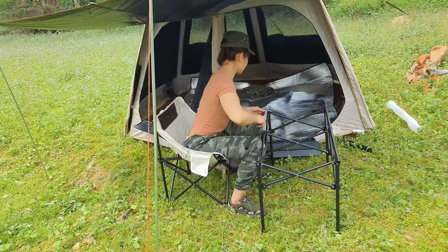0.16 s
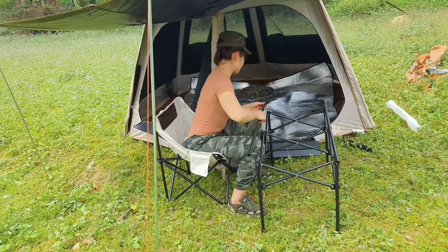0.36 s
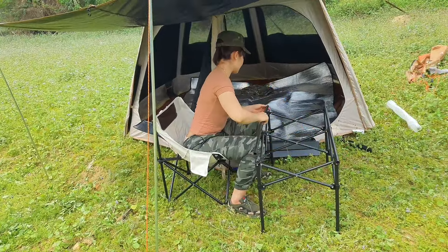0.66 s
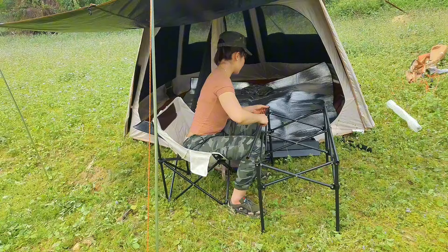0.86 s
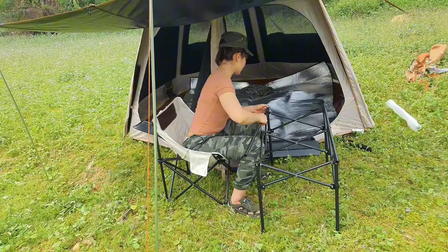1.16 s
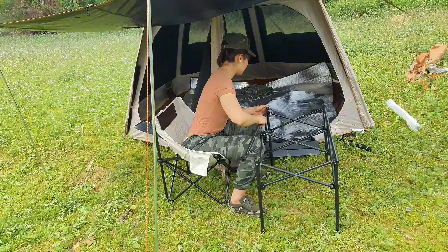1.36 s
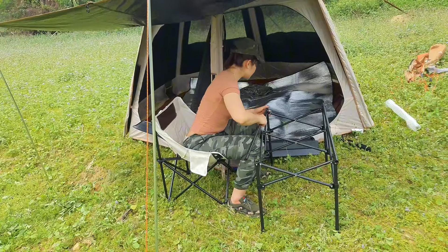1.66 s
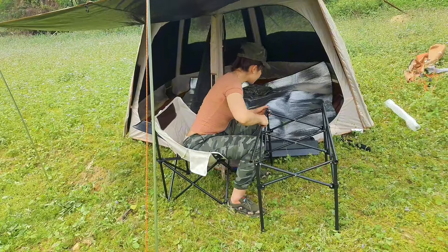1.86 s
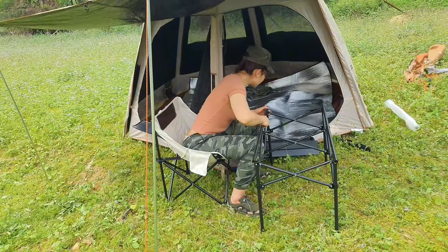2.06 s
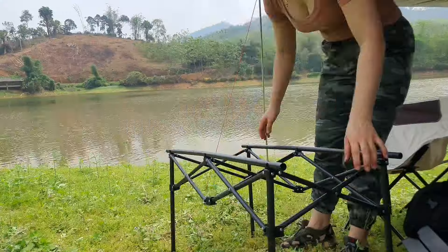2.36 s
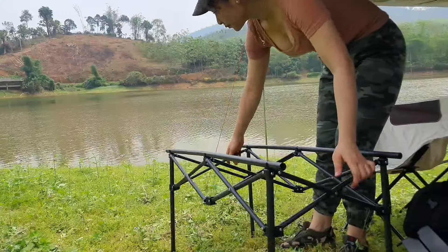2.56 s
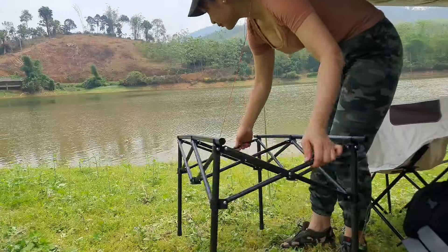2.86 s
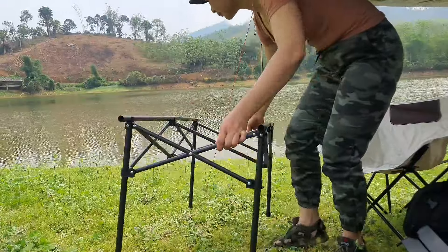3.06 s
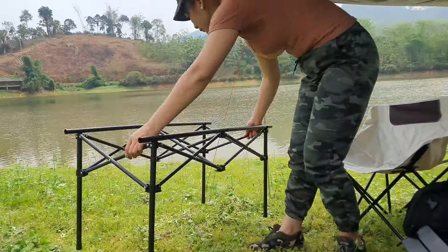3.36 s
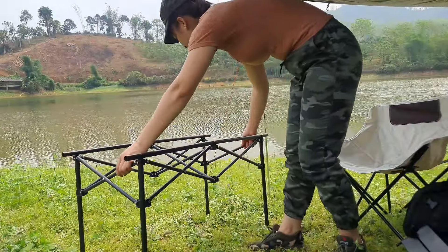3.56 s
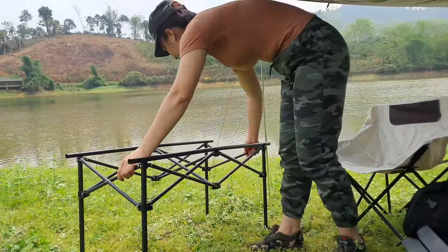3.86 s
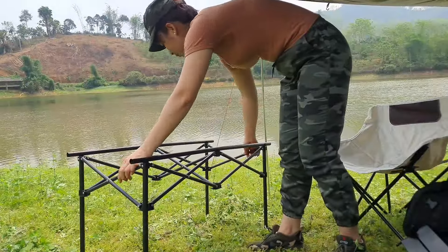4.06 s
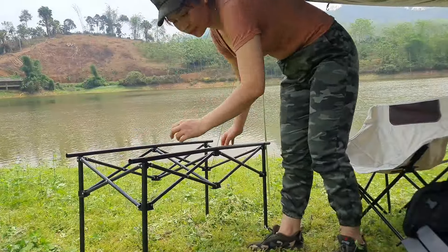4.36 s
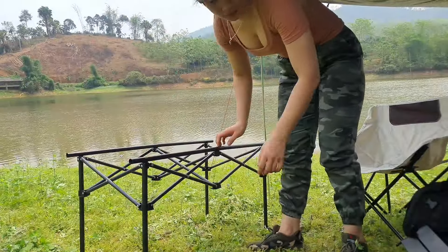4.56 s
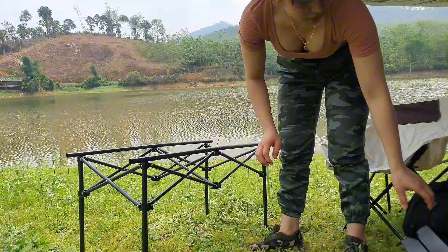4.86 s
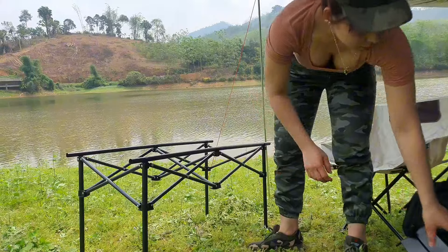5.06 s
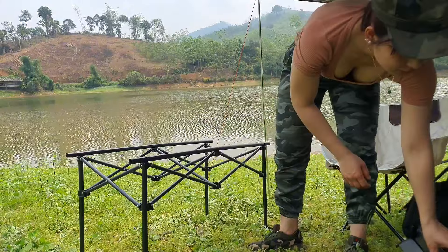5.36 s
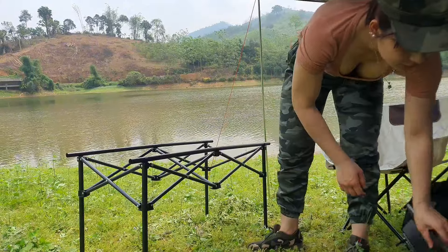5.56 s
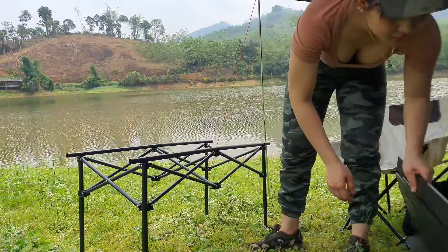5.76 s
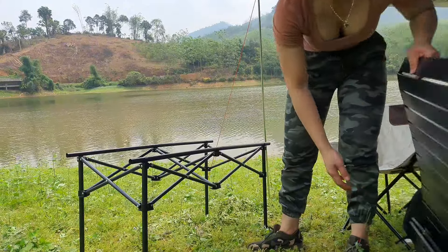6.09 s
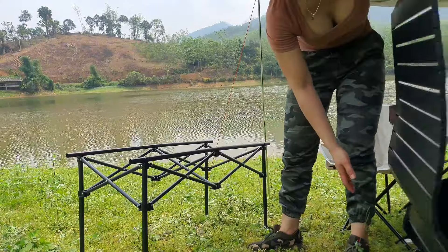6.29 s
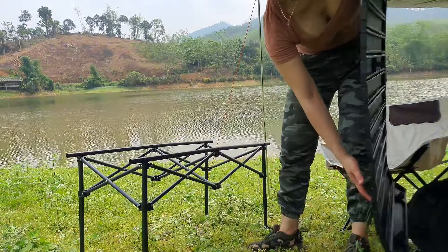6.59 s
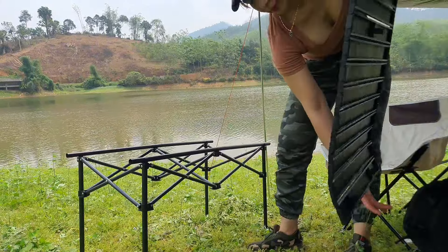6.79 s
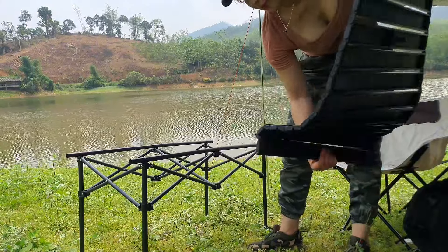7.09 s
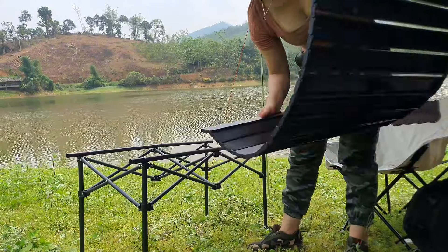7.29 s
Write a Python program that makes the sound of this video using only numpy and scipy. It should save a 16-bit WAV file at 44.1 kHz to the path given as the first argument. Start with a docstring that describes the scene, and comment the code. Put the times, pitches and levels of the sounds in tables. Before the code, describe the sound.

Quiet lakeside air with wind, then distant engine putter; a folding table frame clacks, and loose metal slats clatter on the right.

```python
"""A folding camp table is set up on the grass beside a lake, birds calling around it.
At first wind brushes the left side over a low drone; the tube frame is brushed, snaps open and knocks.
At 2.4 s the level dips briefly; a far engine replaces wind and drone, an insect buzzes, the frame knocks on.
From 5.2 s the roll-up top of metal slats is lifted and clatters, ringing less once it hangs taut.
Blows are flurries of contacts driving damped modes; engine and drone are tones, wind and air are noise."""
import sys
import numpy as np
from scipy import signal
from scipy.fft import rfft, irfft
from scipy.io import wavfile

SR = 44100
rng = np.random.default_rng(int(sys.argv[2]) if len(sys.argv) > 2 else 0)


def materialize(psi):
    """Save the field psi as 16-bit PCM at rate SR to the path in sys.argv[1].

    A 1-D psi becomes a single channel; in a 2-D psi each row is a channel.
    """
    bounded = np.clip(np.atleast_2d(psi).T, -1, 1)
    quanta = np.round(bounded * 32767).astype(np.int16)
    wavfile.write(sys.argv[1], SR, quanta)


N = 327663
TIME = np.arange(N) / SR
SWITCH_S = 2.4  # wind and drone before, engine after

# Ringing modes of the slats. Each row: frequency in Hz, relative level in dB, t60 in seconds.
SLAT_MODES = [(359, -13, 0.23), (547, -12, 0.44), (639, -14, 0.28), (940, -1.5, 0.27), (960, 0, 0.29),
              (1104, -10.5, 0.22), (1514, -1.5, 0.13), (1654, -8.5, 0.26), (2820, -22, 0.18),
              (2816, -5, 0.18), (3600, -20.5, 0.078), (4220, -24, 0.052), (5010, -15, 0.041)]
# Spectrum of the slats' dense short-lived modes. Each row: frequency in Hz, density in dB per Hz.
SLAT_COLOUR = [(60, -23), (160, -4), (300, -13.5), (430, -12), (600, 1), (760, -3), (1050, 3.5),
               (2000, -0.5), (4000, -1), (5800, -7.5), (7700, -9), (8900, -31), (10500, -15.5),
               (15500, -14.5)]


def from_db(db):
    """Decibels to amplitude gain."""
    return 10 ** (np.asarray(db) / 20)


def rms_one(x):
    """Scale to rms 1."""
    return x / np.sqrt(np.mean(x ** 2) + 1e-30)


def in_time(rows):
    """Columns of a breakpoint curve, interpolated at every sample."""
    s, *columns = np.transpose(rows)
    return [np.interp(TIME, s, column) for column in columns]


def at_hz(points, hz):
    """Spectrum read on a log-frequency axis."""
    point_hz, value = np.transpose(points)
    return np.interp(np.log(hz + 1), np.log(point_hz), value)


def add(out, s, sound):
    """Mix a sound in from time s."""
    start = int(round(s * SR))
    low, high = max(start, 0), min(start + sound.shape[-1], N)
    out[..., low:high] += sound[..., low - start:high - start]


def drift(rate_hz):
    """Random wavering between independent normal knots of spread 1, joined by straight lines."""
    knots = rng.standard_normal(2 ** 12)
    return np.interp(TIME * rate_hz, np.arange(len(knots)), knots)


def ring(force, hz, t60_s):
    """One damped mode: a two-pole resonator driven by the force."""
    radius = from_db(-60 / (t60_s * SR))
    w = 2 * np.pi * hz / SR
    return signal.lfilter([0, np.sin(w)], [1, -2 * radius * np.cos(w), radius ** 2], force + 1e-18)


def noise(spectrum, size, bass_db=0, treble_db=0, ripple_db=0, ripple_hz=75):
    """Stereo coloured noise with two shelves, chance resonances and set correlation between the ears."""
    # Likeness of the ears. Each row: frequency in Hz, correlation.
    likeness = [(100, 0.81), (600, 0.58), (1200, 1), (3000, 0.23), (7000, 0.29), (14000, 0.13)]
    hz = np.arange(size // 2 + 1) * SR / size
    shelves_db = bass_db / (1 + (hz / 1400) ** 2) + treble_db / (1 + (6000 / (hz + 1)) ** 2)
    bumps = np.interp(hz / ripple_hz, np.arange(2 ** 10), rng.uniform(-1, 1, 2 ** 10))
    alike = np.clip(at_hz(likeness, hz), 0, 1)
    mid, side = rfft(rng.standard_normal((2, size)))
    ears = np.sqrt(1 + alike) * mid + np.sqrt(1 - alike) * side * [[1], [-1]]
    colour_db = at_hz(spectrum, hz) + shelves_db + ripple_db * bumps
    return rms_one(irfft(ears * from_db(colour_db), size))


def from_right(x, lead_samples, pan_db):
    """A source on the right reaches the left ear later and weaker."""
    i = np.arange(x.shape[-1])
    left = np.interp(i - lead_samples, i, x[0]) * from_db(-pan_db / 2)
    return np.array([left, x[1] * from_db(pan_db / 2)])


def outdoors(x, t60_s, wet_db, treble_db):
    """Tarp, ground and trees scatter a thin decaying tail."""
    t = np.arange(SR) / SR
    colour = [(100, 5), (8000, -2.5), (9000, -3), (11000, -0.5)]  # Hz, dB
    envelope = np.exp(-t * np.log(1000) / t60_s) * (1 - np.exp(-t / .012))
    tail = rms_one(noise(colour, SR, 0, treble_db) * envelope) / np.sqrt(SR)
    return x + from_db(wet_db) * signal.fftconvolve(x, tail, axes=1)[:, :N]


def contact_crackle(power, t60_s):
    """Envelope of overlapping contacts, each dying by 60 dB in t60."""
    fade = from_db(-120 / (t60_s * SR))  # acts on power
    return np.sqrt(signal.lfilter([1], [1, -fade], power) + 1e-20)


def random_touches(size, contacts_per_s, spread_db):
    """Sparse contacts of uneven strength."""
    struck = rng.random(size) < contacts_per_s / SR
    return struck * from_db(spread_db * rng.uniform(-1, 1, size))


def clatter(hits, colour, modes, contacts_per_s, spread_db, contact_t60_s, main_db, mistune):
    """Each blow is a flurry of tiny contacts: every one cracks briefly and all feed the ringing modes."""
    out = np.zeros((2, N))
    t = np.arange(2 ** 14) / SR - 1 / 20  # seconds around the blow
    for s, db, rise_s, t60_s, bass_db, treble_db, ring_db in hits:
        force = np.exp(np.minimum(t, 0) / abs(rise_s) - np.maximum(t, 0) * np.log(1000) / t60_s)
        touches = random_touches(len(t), contacts_per_s, spread_db)
        # only a sudden blow has a hard main contact
        touches[np.searchsorted(t, 0)] = from_db(main_db) / (1 + (rise_s / 0.0027) ** 2)
        crackle = contact_crackle((touches * force) ** 2, contact_t60_s)
        crack = rms_one(crackle * noise(colour, len(t), bass_db, treble_db, ripple_db=5))
        push = touches * force ** 2 * rng.choice([-1, 1], len(t))
        tone = 0
        for hz, mode_db, mode_t60_s in modes:
            detune, strength, lean = rng.standard_normal((3, 2))
            for k in range(2):  # two like parts, a little apart in pitch and place
                mode = rms_one(ring(push, hz * (1 + mistune * detune[k]), mode_t60_s))
                place_db = 2 * lean[k] * np.array([[1], [-1]])
                tone = tone + mode * from_db(mode_db + strength[k] + place_db)
        blow = crack + from_db(ring_db) * rms_one(tone)
        add(out, s + t[0], from_db(db) * np.sqrt(np.mean(force ** 2)) * blow)
    return out


def clacks(rows, ring_db):
    """Sudden blows: the shorter one is, the harder it starts; the shortest are choked and ring less."""
    rise_share, free_t60_s, choke_db = .018, .1, 42  # rise as a share of t60
    hits = []
    for s, db, t60_s, bass_db, treble_db in rows:
        choked_db = choke_db * max(0, 1 - t60_s / free_t60_s)
        hits.append((s, db, rise_share * t60_s, t60_s, bass_db, treble_db, ring_db(s) - choked_db))
    return hits


def slides(rows, ring_db):
    """Rubbing contacts that all swell and die alike."""
    rise_s, t60_s = .0105, .112
    return [(s, db, rise_s, t60_s, bass_db, treble_db, ring_db(s)) for s, db, bass_db, treble_db in rows]


def slat_ring_db(s):
    """Loose slats ring; they are damped once the top hangs taut."""
    taut_s, loose_db, held_db = 6.28, -.5, -17
    return loose_db if s < taut_s else held_db


def slats():
    """Metal slats strike, rub and jostle as the top is lifted on the right."""
    # A slat strikes its neighbour. Each row: peak of force in seconds, level in dB,
    # t60 of the force in seconds, bass shelf in dB, treble shelf in dB.
    slat_clacks = [(5.2228, -52, .17, -7, 4), (5.6003, -36, .025, 1, 26), (5.7185, -36.5, .14, -6, -3),
                   (5.9922, -32.8, .14, -10, -14), (6.009, -41.5, .22, 18, 5), (6.2228, -37.5, .12, 13, 0),
                   (6.246, -38, .18, -12, 11), (6.337, -35.5, .09, 2, 8.5), (6.3775, -27, .037, -17, 0),
                   (6.514, -54.5, .14, 33, -8), (6.659, -45, .14, -36, 11), (6.893, -60, .3, -14, -20),
                   (7.177, -38.5, .07, -3, 3)]
    # Slats slide over each other. Each row: peak in seconds, level in dB, bass shelf in dB, treble shelf in dB.
    slat_slides = [(5.268, -49.5, 2, -8), (5.315, -56, 12, 6), (5.471, -45, 4, -2),
                   (5.503, -39.5, -12, -6.5), (5.534, -35.5, 12, -16), (5.575, -50.5, 16, 8),
                   (5.766, -44, 7, -8), (5.788, -42, -1, 2), (5.816, -40.5, 15, 3), (5.836, -44, 18, 3),
                   (6.268, -37, 7.5, 14), (6.294, -39, -24, -8), (6.393, -40.5, -10, -9),
                   (6.474, -55.5, 36, -8), (6.703, -49.5, -36, 9), (6.776, -59, -40, -2),
                   (7.166, -47.5, -7, -1), (7.188, -35.5, -5, 1)]
    blows = clacks(slat_clacks, slat_ring_db) + slides(slat_slides, slat_ring_db)
    struck = clatter(blows, SLAT_COLOUR, SLAT_MODES, contacts_per_s=1000, spread_db=2,
                     contact_t60_s=0.026, main_db=4.5, mistune=0.0073)
    lift_s, pan_db, pan_db_per_s = 5.2, 3, 1.5  # right minus left, and its drift from the lift on
    place_db = pan_db + pan_db_per_s * np.maximum(TIME - lift_s, 0)
    placed = from_right(struck + jostle(), lead_samples=11, pan_db=place_db)
    return outdoors(placed, t60_s=0.48, wet_db=-23, treble_db=4)


def jostle():
    """Light random contacts keep the slats rustling and ringing between the blows."""
    # Jostling level. Each row: time in seconds, level in dB.
    jostle_level = [(5.15, -100), (5.3, -67), (5.68, -70), (5.88, -60.5), (6.15, -58), (6.35, -57),
                    (6.6, -73), (7.02, -77), (7.17, -60), (7.3, -85)]
    ring_db = -5.5
    touches = random_touches(N, contacts_per_s=1500, spread_db=4)
    crackle = contact_crackle(touches ** 2, t60_s=.05)
    crack = rms_one(crackle * noise(SLAT_COLOUR, N, bass_db=15, treble_db=2.5))
    push = touches * rng.choice([-1, 1], N)
    tone = rms_one(sum(from_db(db) * rms_one(ring(push, hz, t60_s)) for hz, db, t60_s in SLAT_MODES))
    level = from_db(in_time(jostle_level)[0]) * (TIME > jostle_level[0][0])
    return level * (crack + from_db(ring_db) * tone)


def frame_ring_db(s):
    """The frame rings while it stands alone; it is damped while spread with both hands."""
    free_db, held_db = -7.5, -15
    return free_db if s < SWITCH_S else held_db


def frame():
    """The tube frame snaps open, knocks at its joints and is brushed by hands."""
    # Frame blows. Each row: peak of force in seconds, level in dB, t60 of the force in seconds,
    # bass shelf in dB, treble shelf in dB.
    frame_clacks = [(0.741, -67.5, .04, 14, -19), (0.893, -70, .06, 6, -2), (2.019, -67, .15, -4.5, 3),
                    (2.1262, -25.3, .02, 2, -4), (2.133, -35, .115, -5, 0), (2.242, -68, .14, -8, -11),
                    (3.195, -63, .11, 22, -23), (3.2365, -43, .032, 18, -.5), (3.243, -64, .17, 4, 6),
                    (3.322, -63, .05, 27, -19), (3.6, -57, .1, 12, -6)]
    # Hands brush along the tubes. Each row: peak in seconds, level in dB, bass shelf in dB, treble shelf in dB.
    frame_brushes = [(0.105, -73, -5, 5), (1.918, -72, -2, -22), (4.55, -72.5, -12, 16)]
    # Ringing modes of the tubes. Each row: frequency in Hz, relative level in dB, t60 in seconds.
    frame_modes = [(1244, -7.5, .1), (1720, -7, .12), (2800, -9.5, .4), (2880, -8.5, 0.32), (3190, 0, 0.13),
                   (3860, -14.5, .11), (4460, -9, .13), (5200, -7, .2), (5626, -10, .2)]
    # Spectrum of the dense short-lived modes. Each row: frequency in Hz, density in dB per Hz.
    frame_colour = [(80, -18), (180, -2.5), (300, -6), (520, 5.5), (900, -3), (1600, -2.5), (3200, -0.5),
                    (5000, -4), (7500, -10), (9000, -16.5), (11000, -11.5), (15500, -11)]
    blows = clacks(frame_clacks, frame_ring_db) + slides(frame_brushes, frame_ring_db)
    struck = clatter(blows, frame_colour, frame_modes, contacts_per_s=900, spread_db=2.5,
                     contact_t60_s=.018, main_db=3.5, mistune=.008)
    placed = from_right(struck, lead_samples=2, pan_db=3)
    return outdoors(placed + knocks(), t60_s=.3, wet_db=-29, treble_db=-1)


def knocks(contact_s=0.0012):
    """Hollow plastic joints and end caps: a soft contact sets off one quickly damped mode."""
    # Each row: start in seconds, level in dB, pitch in Hz, t60 in seconds, lead of the right ear in samples.
    joint_knocks = [(2.1265, -18.5, 500, 0.017, 2.2), (2.127, -32.5, 210, 0.043, 2.8),
                    (3.2362, -14, 860, 0.0085, 2.7), (3.2387, -35, 1130, 0.022, 2),
                    (3.2368, -22, 1480, 0.0071, 2.8), (5.599, -35, 4000, 0.021, 11),
                    (6.379, -29, 530, 0.087, 11.5), (6.383, -34, 2030, 0.082, 3.1),
                    (6.377, -29, 4700, 0.02, 11), (7.188, -31, 970, 0.038, 6)]
    out, t = np.zeros((2, N)), np.arange(SR // 4) / SR
    for s, db, hz, t60_s, lead_samples in joint_knocks:
        envelope = np.exp(-t * np.log(1000) / t60_s) * (1 - np.exp(-t / contact_s))
        wave = -np.sin(2 * np.pi * hz * t) * envelope
        add(out, s, from_right(from_db(db) * np.array([wave, wave]), lead_samples, pan_db=0.5))
    return out


def engine(jitter=0.0059, puff_db=-11):
    """Far single-cylinder engine: firings are dull thuds with puffs of gas, slowing towards idle."""
    # Thud harmonics. Each row: multiple of the firing rate, relative level in dB.
    exhaust = [(2, -12), (3, -4), (4, -6.5), (5, 1.5), (6, -5.5), (7, -20), (9, -21), (11, -21),
               (12, -23.5)]
    # Loudness. Each row: time in seconds, level in dB.
    engine_level = [(2.5, -63), (2.6, -54), (3.7, -60.5), (3.92, -68), (4.12, -56.5), (4.9, -60),
                    (5.4, -69), (5.85, -63), (7.43, -72)]
    cruise_per_s, idle_per_s = 28.3, 20.5  # firings
    throttle_back_s, slowing_s = 3.45, 1.55  # start, time constant
    slowed = np.exp(-np.maximum(TIME - throttle_back_s, 0) / slowing_s)
    rate_hz = idle_per_s + (cruise_per_s - idle_per_s) * slowed
    phase = 2 * np.pi * np.cumsum(rate_hz * (1 + jitter * drift(25))) / SR
    thuds = sum(from_db(db + 1.6 * drift(2.2)) * np.cos(order * (phase + np.pi)) for order, db in exhaust)
    gas_colour = [(40, -21), (70, 5), (180, 0), (260, -6), (400, -20.5), (700, -41.5), (4000, -93)]  # Hz, dB
    puffs = (1 - np.cos(phase)) ** 2 * noise(gas_colour, N)
    far = rms_one(thuds) + from_db(puff_db) * rms_one(puffs)
    return far * from_db(in_time(engine_level)[0] + np.array([[-2.2], [1.6]]))  # left, right


def wind(left_db=3, right_db=-13, lumps_db=3):
    """A lumpy breeze with a few buffets: low noise, mostly on the left."""
    # Spectrum. Each row: frequency in Hz, density in dB per Hz.
    wind_colour = [(20, -14.5), (35, 0), (60, 6.5), (90, -2.5), (140, -7.5), (300, -17), (450, -27),
                   (900, -44.5), (5000, -90)]
    # Buffets. Each row: peak in seconds, rise above the breeze in dB.
    buffets = [(.05, 4), (.37, 10), (.51, 6), (.88, 7), (.95, 8), (1.44, 4), (1.55, 7), (2.255, 21)]
    breeze_db, half_width_s = -66.5, .024
    gust_db = breeze_db + sum(db * np.exp(-.5 * ((TIME - s) / half_width_s) ** 2) for s, db in buffets)
    ears_db = np.array([[left_db], [right_db]])
    return noise(wind_colour, N) * from_db(gust_db + lumps_db * drift(22) + ears_db)


def drone():
    """Low tones wavering in pitch and level, stronger on the left."""
    # Each row: frequency in Hz, level in dB ahead of the stereo balance.
    hum = [(49.8, -70), (100.5, -72)]
    tones = 0
    for hz, db in hum:
        phase = 2 * np.pi * np.cumsum(hz * (1 + 0.033 * drift(8.5))) / SR
        tones = tones + from_db(db + 2 * drift(5.3)) * np.sin(phase)
    return tones * from_db([[5], [-7]])


def song(first_s, period_s, db, growth_db, count):
    """Evenly repeated notes as (seconds, dB)."""
    return [(first_s + k * period_s, db + k * growth_db) for k in range(count)]


def birds():
    """Short whistled glides, roughened by fast pitch jitter."""
    # Notes. Each holds: length in seconds, pitches in Hz at even steps.
    swoop, chip, upslur, pip = (.078, [3450, 2750, 1980, 1930, 1900]), (.048, [3480, 3180, 2800]), (.07, [4300, 4330, 4450, 5100]), (.025, [3090, 2870])
    # Single calls. Each row: start in seconds, relative level in dB.
    swoops, chips = [(.857, -76), (1.081, -74), (1.32, -73.5)], [(.627, -65), (1.2, -64.5), (4.428, -72.5)]
    # Even repeats. Each holds: first start in seconds, period in seconds, relative level in dB, gain per note in dB.
    upslur_song, pip_song = (2.66, .279, -86, .35), (3.906, .303, -82.5, 1.9)
    calls = [(swoop, swoops), (chip, chips),
             (upslur, song(*upslur_song, count=9)), (pip, song(*pip_song, count=5))]
    out = np.zeros(N)
    for (length_s, glide_hz), notes in calls:
        u = np.arange(int(length_s * SR)) / (length_s * SR)  # 0..1 through the note
        for s, db in notes:
            rasp = 1 + .033 * drift(500)[:len(u)]
            pitch_hz = np.interp(u, np.linspace(0, 1, len(glide_hz)), glide_hz) * rasp
            whistle = np.sin(2 * np.pi * np.cumsum(pitch_hz) / SR)
            add(out, s, from_db(db) * np.sin(np.pi * u ** .8) * whistle)
    return out


def narrow_band(hz, width_hz):
    """A tone blurred into a band of noise by random quadrature amplitudes."""
    phase = 2 * np.pi * hz * TIME
    return drift(2 * width_hz) * np.sin(phase) + drift(2 * width_hz) * np.cos(phase)


def swell(u):
    """Rounded gate, open while u runs from 0 to 1."""
    return np.sqrt(np.abs(np.sin(np.pi * u)))


def insect():
    """A narrow high band buzzes in regular bursts."""
    start_s, period_s, burst_s = 2.54, .755, .32
    hz, width_hz, relative_db = 7240, 220, -90.5
    burst = np.clip((TIME - start_s) % period_s / burst_s, 0, 1) * (TIME > start_s)
    return from_db(relative_db) * swell(burst) * narrow_band(hz, width_hz)


def far_callers():
    """Farther birds and animals blur into gated bands of noise."""
    # Each row: start in seconds, length in seconds, centre in Hz, width in Hz, relative level in dB.
    far_calls = [(0, .39, 5300, 600, -81.5), (.22, .19, 1600, 200, -81), (.85, .17, 4970, 200, -85),
                 (1.55, .11, 1570, 200, -79), (1.69, .08, 4620, 150, -83), (4.015, .11, 5050, 80, -85.5),
                 (4.783, .2, 403, 30, -71), (4.98, .14, 4000, 100, -86)]
    out = np.zeros(N)
    for s, length_s, hz, width_hz, db in far_calls:
        gate = swell(np.clip((TIME - s) / length_s, 0, 1))
        out += from_db(db) * gate * narrow_band(hz, width_hz)
    return out


def wildlife():
    """Birds, insect and far callers in the centre, with a strong scattered tail."""
    calls = (birds() + insect() + far_callers()) * np.ones((2, 1))
    return from_db(-5) * outdoors(calls, t60_s=0.18, wet_db=-2, treble_db=-5)


def rumble():
    """Low noise of changing level."""
    # Spectrum. Each row: frequency in Hz, density in dB per Hz.
    rumble_colour = [(20, -28.5), (36, -14.5), (48, 10), (75, -3.5), (130, 2.5), (200, -6.5), (320, -13.5),
                     (500, -25.5), (1000, -45.5), (5000, -90)]
    # Each row: time in seconds, level in dB.
    rumble_level = [(0, -61.5), (.6, -77), (1.6, -74), (2.3, -61.5), (3.9, -67.5), (4.2, -63), (5.6, -64),
                    (6.0, -60), (6.7, -71.5), (7.25, -58.5), (7.43, -67)]
    return from_db(in_time(rumble_level)[0]) * noise(rumble_colour, N)


def outdoor_air():
    """Broad noise of changing level."""
    # Spectrum. Each row: frequency in Hz, density in dB per Hz.
    air_colour = [(250, 15), (500, 6), (900, -2), (1700, -4), (3000, -8.5), (4500, -7), (6500, -12),
                  (9000, -20), (12000, -10.5), (15500, -8.5)]
    # Each row: time in seconds, level in dB.
    air_level = [(0, -65), (.15, -74.5), (1.7, -76.5), (2.3, -71), (2.7, -75), (3.6, -76.5), (5.3, -76.5),
                 (6.3, -56), (6.65, -65.5), (7.43, -75)]
    return from_db(in_time(air_level)[0]) * noise(air_colour, N)


def scene():
    """Slats and frame close by; engine or wind, wildlife, rumble and air behind."""
    table = slats() + frame()
    backdrop = np.where(TIME < SWITCH_S, wind() + drone(), engine())
    return table + backdrop + wildlife() + rumble() + outdoor_air()


def record(dry):
    """The level dips briefly; a steep low-pass removes the top."""
    # Each row: time in seconds, gain in dB.
    dropout = [(2.35, 4), (2.365, -31), (2.4, -45.5), (2.51, -35), (2.535, -4), (2.56, 4)]
    cutoff_hz = 15400
    dip_db, = in_time(dropout)
    low_pass = signal.ellip(10, .2, 70, cutoff_hz, fs=SR, output="sos")
    return signal.sosfilt(low_pass, dry * from_db(dip_db))


dry = scene()
out = record(dry)
materialize(out)
```